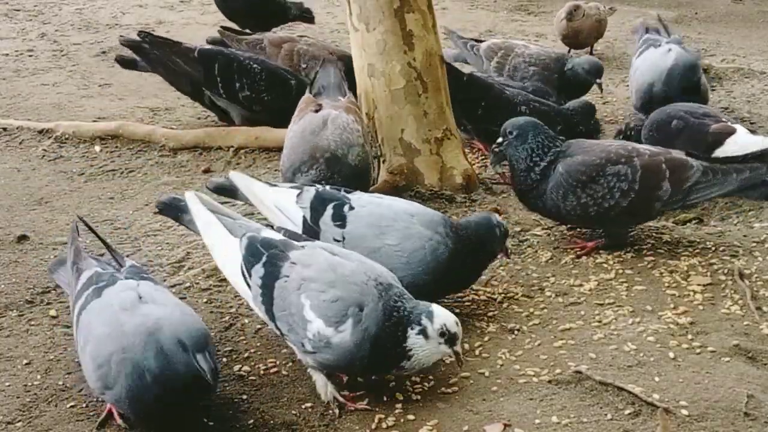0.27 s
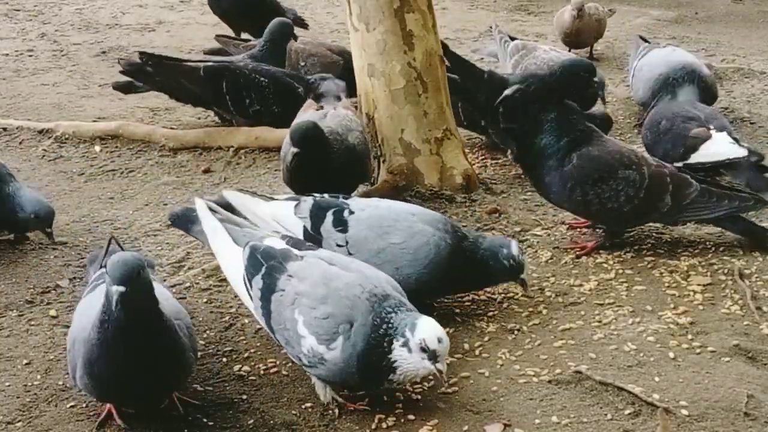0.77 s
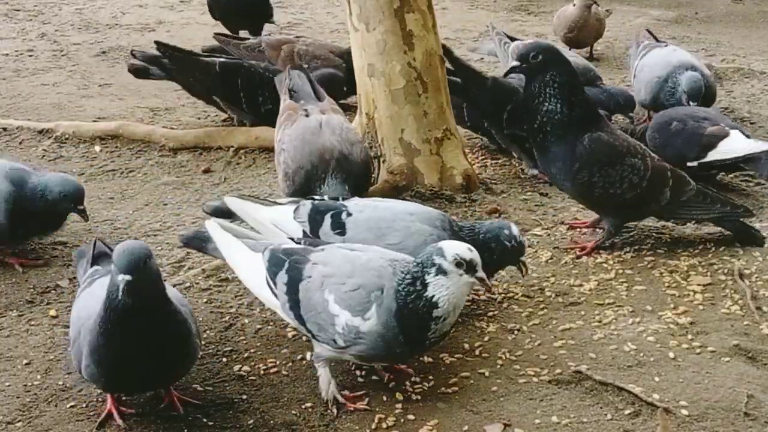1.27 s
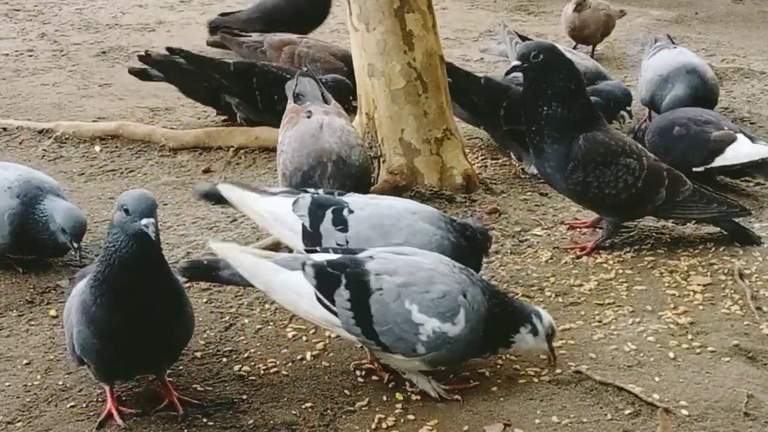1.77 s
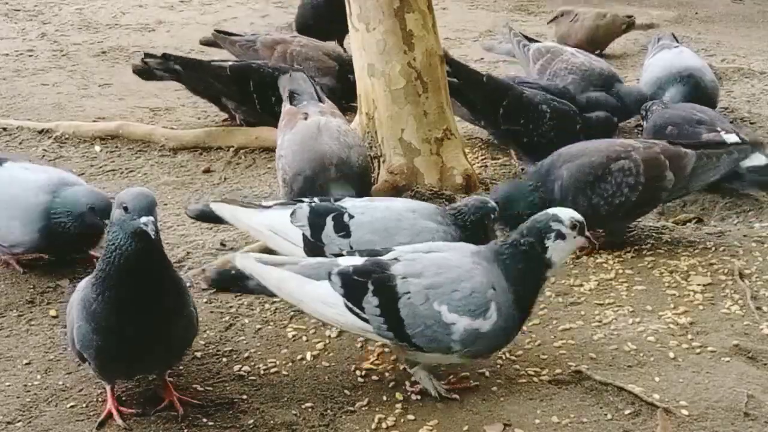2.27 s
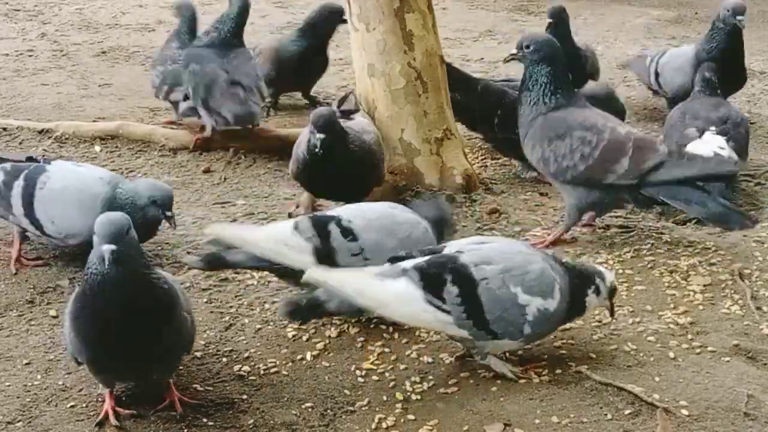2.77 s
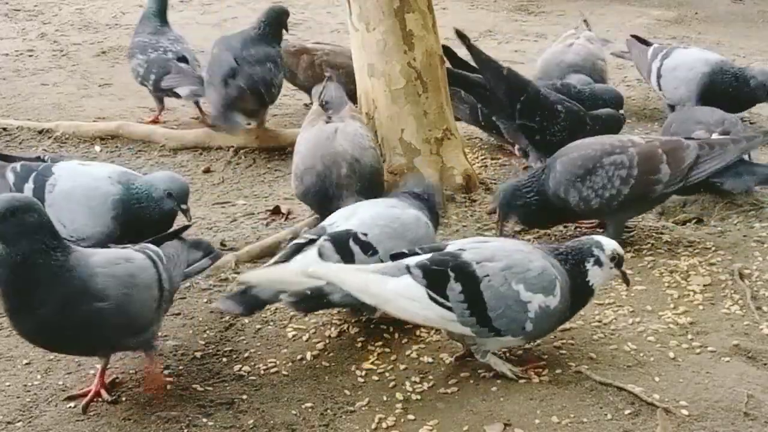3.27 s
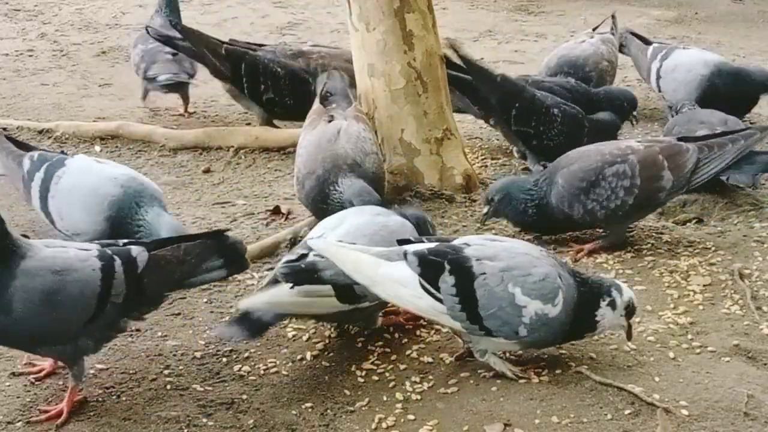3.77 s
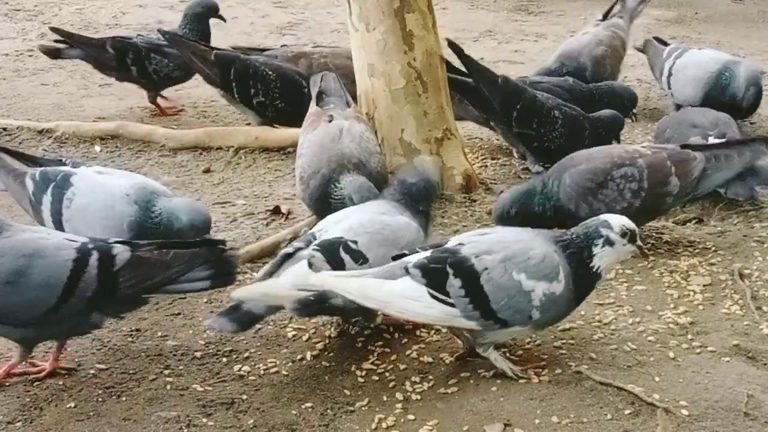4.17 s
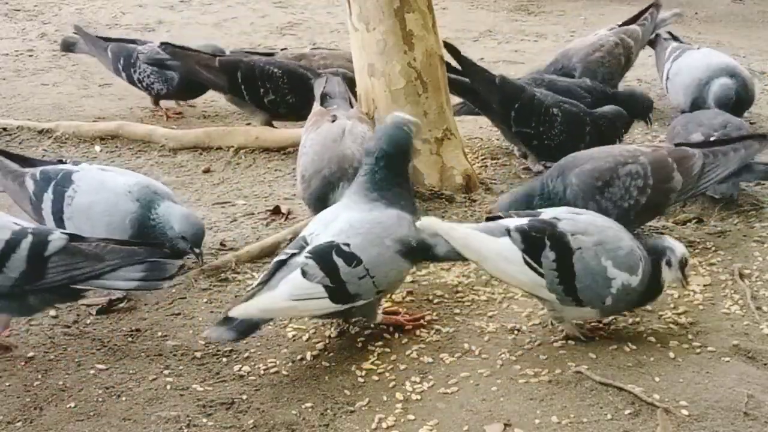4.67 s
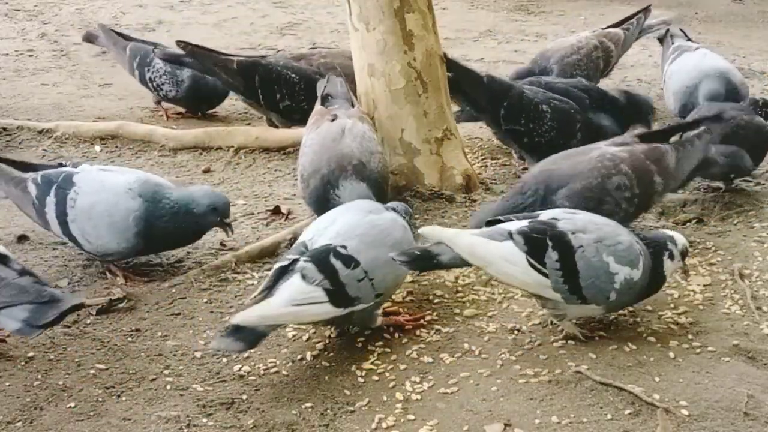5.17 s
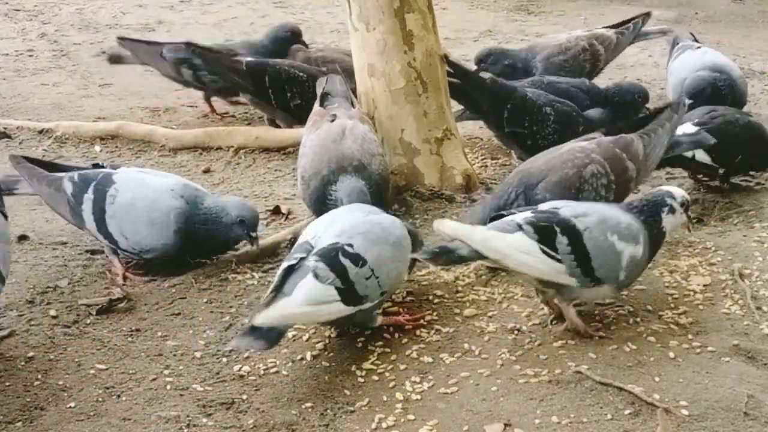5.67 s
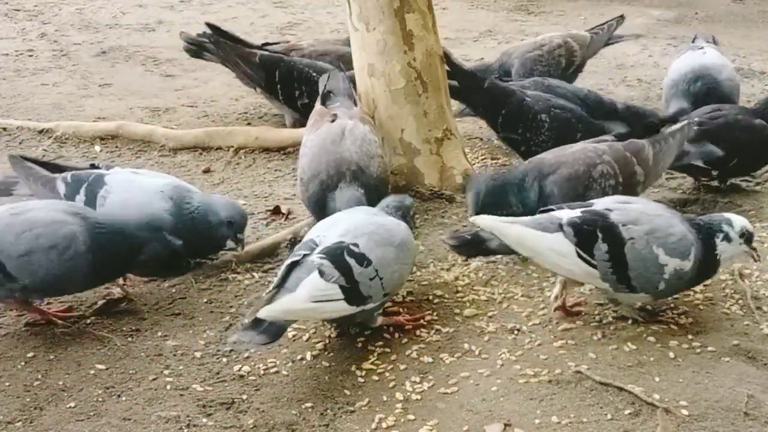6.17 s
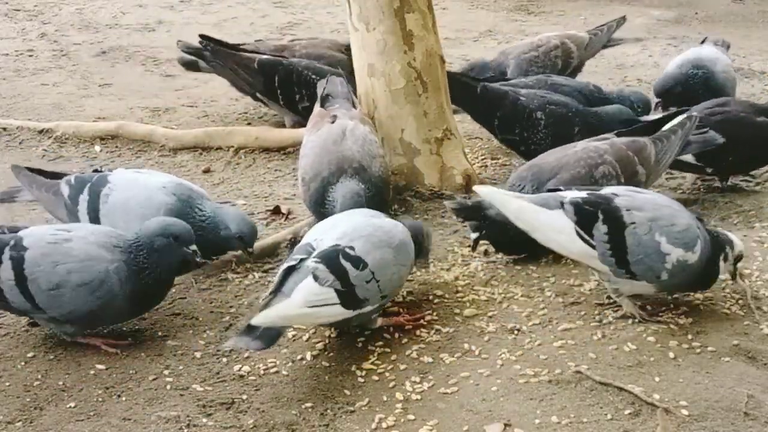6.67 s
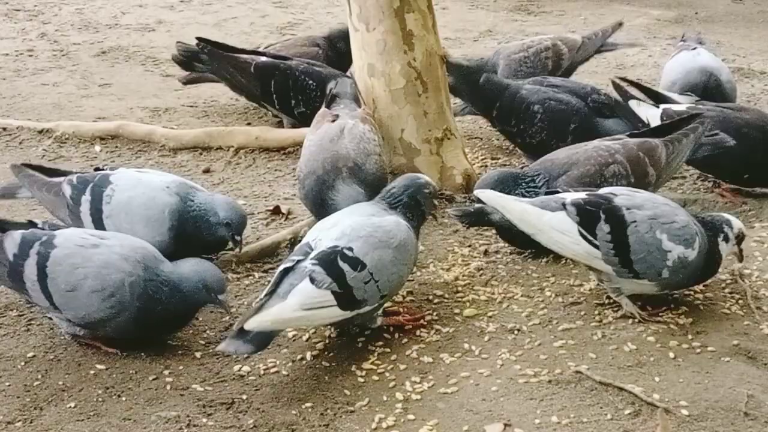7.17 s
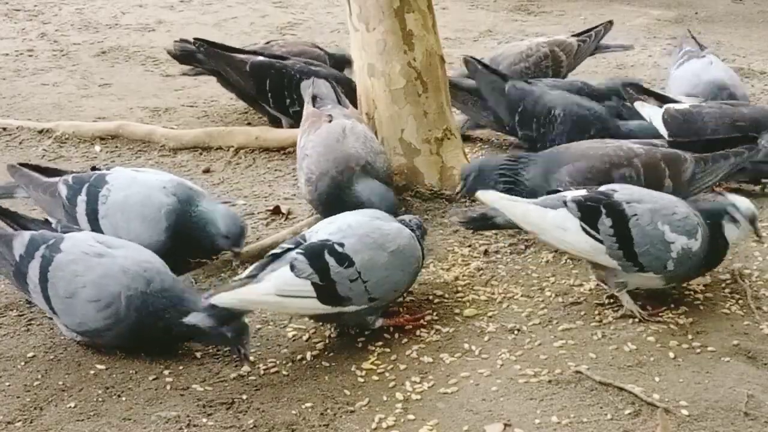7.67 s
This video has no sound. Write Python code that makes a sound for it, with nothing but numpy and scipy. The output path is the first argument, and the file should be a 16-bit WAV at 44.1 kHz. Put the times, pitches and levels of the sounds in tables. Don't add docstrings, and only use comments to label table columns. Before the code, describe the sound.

Close to a feeding flock of pigeons on bare ground, feathers rustle and soft wing puffs thump. Around two and a half seconds a loud wing clap starts a rapid flapping burst with throaty grunts, trailing off in thin wing whistles. Sparrows chirp brightly further off, echoing from walls. Near the end one pigeon gives a throbbing low coo. A faint town hum lies beneath, heard through a small microphone with little deep bass.

```python
import sys
import numpy as np
from scipy import signal
from scipy.io import wavfile
from scipy.ndimage import uniform_filter1d

SR = 44100
rng = np.random.default_rng(int(sys.argv[2]) if len(sys.argv) > 2 else 0)


def wav_record(signal):
    frames = np.transpose(np.atleast_2d(signal))
    bounded = np.clip(frames, -1, 1)
    quanta = np.round(bounded * 32767).astype(np.int16)
    wavfile.write(sys.argv[1], SR, quanta)


def boost(x):
    u = np.asarray(x, float) / 20
    return 10 ** u


N = 349713
AIR = [1, 1j] @ rng.standard_normal((2, 2 * N))


def evened(x):
    return x / np.sqrt(np.mean(x ** 2) + 1e-20)


def read(points, hz):
    f, value = np.transpose(points)
    return np.interp(np.log(hz + 1), np.log(f + 1), value)


def add(mix, s, sound):
    part = mix[max(round(s * SR), 0):][:len(sound)]
    part += sound[:len(part)]


def span(length):
    return np.arange(0, max(length, .004), 1 / SR)


def band(x, low_hz, high_hz, order):
    return signal.sosfilt(signal.butter(order, [low_hz, high_hz], "band", fs=SR, output="sos"), x)


def ring(hz, width_hz, shape):
    settle = 3000
    r = np.exp(-np.pi * width_hz / SR)
    raw = AIR[rng.integers(N):][:len(shape) + settle]
    wobble = signal.lfilter([1], [1, -2 * r, r * r], raw)[settle:]
    phase = 2 * np.pi * np.cumsum(hz * np.ones(len(shape))) / SR
    tone = (wobble * np.exp(1j * phase)).real
    return evened(shape * tone) * np.sqrt(np.mean(shape ** 2))


def noise(colour, patchy_db, flicker_db):
    frames, hz = N // 256 + 2, np.fft.rfftfreq(1024, 1 / SR)
    a, b, patches = rng.standard_normal((frames, len(hz), 3)).T
    patches = uniform_filter1d(patches, size=12, axis=0)
    patches = evened(uniform_filter1d(patches, size=12, axis=1))
    flicker = evened(uniform_filter1d(rng.standard_normal(frames), size=3))
    db = read(colour, hz)[:, None] + patchy_db * patches + flicker_db * flicker
    z = (a + 1j * b) * boost(db)
    return evened(signal.istft(z, nperseg=1024, noverlap=768)[1][:N])


# (frequency [Hz], level per Hz [dB])
TOWN = [(15, -53), (25, -57), (75, 4.5), (113, 9.5), (331, -10), (399, -59), (703, -40), (1300, -12.5),
        (2170, -15.5), (4500, -11), (5430, -13.5), (6730, -8.5), (9050, -28), (11800, -30), (15500, -21)]


def town():
    return boost(-60) * noise(TOWN, 1.3, 1.0)


# (time [s], length [s], start pitch [Hz], end pitch [Hz], level [dB])
SQUEALS = [(4.16, .15, 690, 680, -62), (5.06, 0.82, 1050, 990, -67.5), (4.59, .07, 1010, 1000, -64),
           (6.68, .22, 2330, 2290, -68), (5.86, .6, 3330, 3136, -67.5), (5.86, .5, 6570, 6440, -67.5),
           (6.17, .25, 3920, 3880, -72), (6.99, .08, 3860, 3840, -67), (6.852, .44, 681, 673, -64),
           (6.85, 1.3, 2290, 2170, -67.5), (.86, .11, 3520, 3480, -71), (1.48, .1, 4650, 4500, -70)]
# (time [s], length [s], start pitch [Hz], end pitch [Hz], level [dB])
SWEEPS = [(0.065, 0.27, 3750, 5170, -65), (1.915, 0.35, 4320, 4770, -62.5), (3.746, 0.088, 4600, 4730, -61),
          (6.504, 1.4, 3100, 2750, -66), (6.74, 0.14, 4300, 4900, -68), (7.9, 0.12, 674, 735, -47.5),
          (7.17, .07, 340, 330, -56), (7.04, .09, 225, 215, -57), (6.68, .12, 330, 250, -59),
          (5.17, 0.097, 9150, 8950, -69), (5.3, .2, 6600, 6800, -63), (6.65, .2, 1780, 1740, -66),
          (6.47, 0.039, 2200, 2380, -62), (6.2, .15, 4200, 4400, -70)]
# (time [s], length [s], start pitch [Hz], end pitch [Hz], level [dB])
WHOOSHES = [
    (5.17, 0.5, 1760, 1750, -62),
    (6.25, 0.49, 1800, 1810, -61),
    (7.091, 0.37, 4370, 4550, -65),
    (.33, 0.317, 909, 892, -55.5),
    (2.201, 0.12, 1860, 1555, -63),
    (2.454, 0.027, 2720, 2470, -48.5),
]


def far():
    out = np.zeros(N)
    for rows, width_hz in ((SQUEALS, 62), (SWEEPS, 180), (WHOOSHES, 320)):
        for s, length, from_hz, to_hz, db in rows:
            u = span(length) / length
            hz = from_hz + (to_hz - from_hz) * u
            shape = signal.windows.tukey(len(u), .7)
            sound = ring(hz, width_hz, shape)
            if rows is SQUEALS:
                sound = sound + boost(-6) * shape * np.sin(2 * np.pi * np.cumsum(hz) / SR)
            add(out, s, boost(db) * sound)
    return out


# (time into call [s], length [s], start pitch [Hz], end pitch [Hz], level [dB])
CHEEP = ([(0, .036, 2546, 3010, -4), (.003, 0.0374, 3124, 3290, 10.5)], [(.026, 0.024, 3300, 4500, -2.5),
         (.044, 0.048, 4640, 4330, -2.5)])
RISER = ([(.008, .045, 2520, 3560, 0)], [(.03, 0.035, 3186, 4370, -12), (.058, .045, 4650, 3950, -4)])
CHIRRUP = ([(0, .03, 2526, 3073, 0.011), (.03, 0.0303, 3087, 2940, 2.2), (.048, .032, 2680, 2410, -2),
           (.056, 0.097, 7300, 6780, -2)], [(.088, 0.022, 3100, 4000, -7), (.106, 0.022, 4120, 3900, -1),
           (.121, .04, 3750, 3200, -2)])
# (time [s], lead level [dB], main level [dB], pitch reach [ratio], pace stretch [ratio])
CHEEPS = [
    (1.711, -68.5, -40, 0.94, 1.08),
    (4.176, -58.5, -35.5, 1.03, 0.87),
]
RISERS = [
    (5.127, -62.5, -31.5, 1.12, 0.95),
]
CHIRRUPS = [
    (3.309, -67, -50.5, 0.81, 1.04),
    (4.423, -61, -42, 0.84, 0.89),
    (6.418, -59.5, -45, 0.85, 0.98),
    (7.692, -58, -43, 0.8, 0.97),
]
# (starting pitch [Hz], octave over tone [dB])
OCTAVE = [(2550, 17), (3040, 19.5), (3120, -0.5), (3150, -18), (4600, -20)]
# (time [s], length [s], start pitch [Hz], end pitch [Hz], level
# [dB])
PEEPS = [(0.838, 0.014, 6500, 5800, -52), (0.864, 0.014, 4440, 5500, -52), (0.954, 0.0235, 6800, 6950, -47),
         (0.96, 0.016, 6570, 3730, -48), (0.964, 0.057, 2750, 3520, -54), (0.98, 0.022, 3800, 4700, -43),
         (1.0, 0.05, 4700, 3600, -42.5), (1.498, 0.054, 6060, 5320, -63), (2.217, 0.053, 3730, 3720, -56),
         (2.204, 0.057, 5450, 4200, -52), (3.848, 0.02, 5100, 5600, -50), (3.897, 0.028, 5850, 6300, -37.5),
         (3.862, 0.03, 6250, 5900, -44), (1.717, 0.03, 2587, 3410, -47.5),
         (3.919, 0.021, 3254, 4320, -41.5), (3.925, 0.03, 4104, 3795, -41), (4.252, 0.031, 4010, 3870, -43),
         (5.29, 0.07, 4900, 4250, -47), (5.36, 0.025, 3450, 3350, -53), (5.762, 0.012, 4700, 4300, -54),
         (5.672, .012, 4900, 5500, -47), (5.684, .04, 5500, 6400, -52), (5.72, .05, 6600, 5500, -52),
         (5.68, .04, 2750, 3200, -54), (5.7, .04, 3250, 3950, -47), (5.74, .035, 4150, 3400, -40.5),
         (5.77, .03, 3500, 3200, -52), (3.86, .05, 3000, 3250, -59), (3.93, .016, 4720, 4350, -50),
         (1.04, .04, 6900, 6200, -56), (1.48, .03, 6000, 5950, -64), (7.75, .02, 7350, 7250, -52),
         (7.815, .02, 7100, 6600, -53),
         (.963, 0.019, 3630, 3700, -50.5), (1.0, 0.064, 4000, 3000, -51.5),
           (1.26, 0.025, 3150, 2900, -65), (1.708, 0.026, 2890, 3260, -56), (1.735, .03, 3410, 4100, -47),
           (1.765, 0.047, 3870, 3560, -50.5), (1.778, .015, 4980, 5560, -49),
           (2.197, 0.04, 7000, 6700, -59), (2.198, .03, 6200, 5500, -57), (2.22, .06, 3300, 2600, -58),
           (5.183, .045, 4870, 4800, -42), (5.205, .03, 4500, 4350, -36), (6.418, .015, 4500, 4900, -53),
           (4.478, .018, 7400, 7350, -54), (4.53, .04, 7400, 6600, -56), (.845, .014, 5200, 3700, -50),
           (.875, .03, 5700, 5300, -59), (4.25, .025, 4550, 4500, -41), (3.44, .015, 7000, 6500, -58),
           (3.914, .014, 6200, 7200, -48), (5.14, 0.033, 5000, 7360, -49), (6.445, 0.029, 6150, 6000, -44),
           (6.482, 0.026, 4800, 4700, -48), (6.528, .02, 3920, 3850, -45), (7.796, .022, 3920, 3820, -43),
           (7.364, 0.035, 6200, 6320, -48), (7.368, 0.025, 5040, 5770, -43),
           (7.372, 0.031, 2710, 3000, -54), (7.375, 0.02, 3350, 3500, -51),
           (7.392, 0.023, 3480, 4750, -34.5), (7.414, 0.023, 4750, 4450, -30.5),
           (7.437, 0.034, 4430, 4263, -31.5), (7.705, 0.048, 6180, 5900, -41), (7.7, .04, 2850, 3050, -61),
           (7.748, 0.021, 4950, 4880, -50)]


def strokes():
    reach_from_hz = 3100
    for shape, calls in ((CHEEP, CHEEPS), (RISER, RISERS), (CHIRRUP, CHIRRUPS)):
        for s, lead_db, main_db, reach, stretch in calls:
            for part, part_db in zip(shape, (lead_db, main_db)):
                for after, length, *hz, db in part:
                    octave_db = part_db + db + read(OCTAVE, hz[0])
                    if part is shape[1]:
                        hz = [reach_from_hz + (f - reach_from_hz) * reach for f in hz]
                    yield s + after * stretch, length * stretch, *hz, part_db + db, octave_db
    for *stroke, db in PEEPS:
        yield *stroke, db, db - 17.5


def sparrows():
    bend, swell_db = -.03, 14.5
    out, top = np.zeros(N), np.zeros(N)
    for s, length, from_hz, to_hz, db, octave_db in strokes():
        u = span(length) / length
        hz = from_hz + (to_hz - from_hz) * (u + bend * np.sin(2 * np.pi * u))
        shape = signal.windows.tukey(len(u), .45)
        rasp = boost(-5.5) * ring(hz * 0.95, 800.0, shape) + boost(-20.) * ring(hz * 1.3, 1700.0, shape)
        swell = boost(db + swell_db * np.log2(hz / hz.max()))
        octave = ring(2 * hz, 193.0, shape) + boost(-8.0) * ring(2 * hz, 1350.0, shape)
        add(out, s, swell * (ring(hz, 150.0, shape) + rasp))
        add(out, s, boost(octave_db) * octave)
        add(top, s, boost(max(db, octave_db) - 38.0) * ring(3 * hz, 500., shape))
        add(top, s, boost(octave_db - 31.5) * ring(4 * hz, 400., shape))
    return top + band(out, 2500., 7300., 6)


# (frequency [Hz], time to fall 60 dB [s])
YARD = [(300, 0.54), (2500, 0.63), (4500, 0.55), (7000, 0.48), (12000, 0.28)]
# (delay [s], level [dB])
WALLS = [
    (0, 2.5),
    (.04, -0.5),
    (.08, -4),
    (.12, 2.5),
    (.16, 1),
    (.2, 1.5),
    (.25, -0.5),
    (.3, 3),
    (.5, -34),
]


def yard(x):
    paths, turn_s = 7, .06
    taps = np.zeros((paths, SR))
    at = np.arange(200, SR - 20, 20)
    size = (paths, len(at))
    np.put_along_axis(taps, at + rng.integers(0, 20, size), rng.choice([-1., 1.], size), axis=1)
    hz, t, z = signal.stft(taps, SR, nperseg=256)
    decay_db = -60 * t / read(YARD, hz)[:, None]
    wall_db = np.interp(t, *np.transpose(WALLS))
    tails = signal.istft(z * boost(decay_db + wall_db), SR, nperseg=256)[1]
    away = (np.arange(N) / SR / turn_s - np.arange(paths)[:, None]) % paths - 1
    share = np.cos(np.pi / 2 * np.clip(away, -1, 1))
    echoes = signal.fftconvolve(x * share, tails / np.linalg.norm(tails[0]), axes=1)
    return echoes[:, :N].sum(axis=0)


# (frequency [Hz], level per Hz [dB])
HISS = [(1530, -14), (2600, -6), (3500, -5.5), (4150, -2.5), (5380, -3.5), (6770, 2), (9520, -19.5),
        (11900, -18), (15300, -13)]
# (frequency [Hz], level per Hz [dB])
SWISH = [(140, -2), (230, -2), (338, -0.5), (440, -3.5), (943, -6.5), (1250, -12), (2600, -18), (3380, -78),
         (5720, -120)]
# (peak time [s], rise [s], fall [s], swish level [dB], hiss
# over swish [dB])
SWELLS = [(.46, 0.16, 0.28, -55, -8), (1.04, 0.24, 0.26, -66.5, -3.5), (1.77, 0.083, 0.29, -63, -6.5),
          (2.25, 0.23, 0.18, -70.5, 1.5), (2.46, 0.017, 0.43, -54, -8.5), (2.87, 0.07, 0.13, -59, -1.5),
          (2.98, 0.054, 0.071, -61, 1), (3.13, 0.033, 0.032, -52.5, -9.5), (3.3, 0.2, 0.48, -64.5, -8),
          (3.89, 0.075, 0.38, -64.5, 1), (4.37, 0.1, 0.22, -70, 6.5), (4.39, 0.032, 0.11, -59, -6),
          (4.7, 0.11, 0.3, -73.5, 3), (4.931, 0.29, 0.056, -71.5, 5), (5.13, 0.011, 0.25, -63.5, -5),
          (2.56, 0.045, 0.091, -65.5, 1.5), (2.68, 0.036, 0.059, -66.5, -2), (2.78, 0.026, 0.062, -66.5, 2),
          (.3, 0.037, .06, -62.5, -11), (.64, 0.046, .16, -66, -4), (.77, .04, .05, -68, -2),
          (7.19, 0.055, 0.073, -64, -17), (5.47, 0.26, 0.065, -72, 5), (6.49, 0.089, 0.61, -67.5, -1),
          (6.881, 0.027, 0.55, -57.5, -24), (7.42, 0.12, 0.22, -71.5, 5.5), (7.75, 0.21, 0.12, -71, 4)]


def feathers():
    t = np.arange(N) / SR
    swish_power, hiss_power = boost(-69.5) ** 2, boost(-101) ** 2
    for s, rise_s, fall_s, db, hiss_db in SWELLS:
        away = np.where(t < s, (s - t) / rise_s, (t - s) / fall_s)
        burst = boost(db - 10 * away) ** 2
        swish_power = swish_power + burst
        hiss_power = hiss_power + burst * boost(hiss_db) ** 2
    grains = rng.exponential(1, N) * (rng.random(N) < .006)
    grain = evened(1 + 0.18 * evened(uniform_filter1d(grains, size=60)))
    hiss = np.sqrt(hiss_power) * boost(12.5) * noise(HISS, 0.96, 1.73) * grain
    return hiss + np.sqrt(swish_power) * boost(4.0) * noise(SWISH, 2.8, 1.1)


# (time [s], peak level [dB], pitch [Hz])
PUSHES = [(0.265, -35.5, 118.6), (0.363, -32.5, 148), (0.45, -32, 124), (0.513, -34, 99), (0.629, -38, 130),
          (0.725, -41, 96), (0.826, -47, 134), (0.924, -45, 93.5), (1.181, -39.5, 76), (1.538, -50, 87),
          (1.75, -42, 96), (1.809, -43, 73), (1.899, -33.5, 102), (2.269, -48, 125), (2.448, -42.5, 95),
          (2.742, -38.5, 95), (2.812, -45.5, 106), (2.87, -43, 99), (4.067, -40, 144), (5.25, -46, 120),
          (6.471, -54, 135)]


def pushes():
    out = np.zeros(N)
    u = span(0.033) / 0.04
    shape = np.clip(u / 0.28, 0, 1) * (1 - u)
    for s, db, hz in PUSHES:
        add(out, s - .004, boost(db - 5.5) * ring(hz, 97.0, shape))
    return out


# (time [s], peak level [dB])
TICKS = [(.19, -54), (.2865, -46), (.3765, -46), (.4605, -47), (4.435, -52), (2.4445, -33), (4.393, -50),
         (4.65, -53), (5.1187, -35), (6.14, -55), (6.272, -56)]


def ticks():
    out, t = np.zeros(N), span(.006)
    for s, db in TICKS:
        add(out, s, boost(db) * .5 * ring(8800., 4500., np.exp(-t / 0.00074)))
    return out


# (time [s], peak level [dB])
WHISTLES = [(2.4424, -49), (2.567, -58), (2.66, -45), (2.7946, -47), (2.8877, -42.5), (3.0007, -40),
            (3.1236, -44), (3.228, -52), (3.375, -48.5), (3.532, -47), (3.654, -45.5), (3.7503, -40.5),
            (3.8607, -45), (3.9723, -44.5), (4.079, -43), (4.2, -55), (4.3363, -46.5), (4.476, -51),
            (4.7964, -53.5), (4.9172, -51), (5.0253, -50.5), (5.129, -48.5)]


def whistles():
    out = np.zeros(N)
    u = span(.1) / .1
    hz = 2350 * (.98 + 0.024 * u)
    shape = np.clip(u / 0.12, 0, 1) * (1 - u) ** 0.7
    for s, db in WHISTLES:
        add(out, s - .004, boost(db - 12.0) * ring(hz, 160.0, shape))
    return out


# (time [s], peak level [dB], body over snap [dB], body pitch [Hz])
CLAPS = [(0.18, -52, 6, 924), (0.276, -48, 4, 2000), (0.368, -46, 4, 1400), (0.54, -37, -6, 965),
         (0.634, -43, -6, 1170), (1.6208, -43, -2, 2050), (2.4435, -22.5, -33, 2200),
         (2.4441, -28.5, -23, 930), (2.536, -32, -22, 1790), (2.646, -29, -9.5, 1910),
         (2.7521, -29, -2, 1450), (2.8645, -31, -2, 1556), (2.9265, -28, -45, 1630),
         (2.9796, -28.5, -5, 1290), (3.0968, -33.5, -9, 1350), (3.124, -30.5, -24, 930),
         (3.1309, -27.5, -22, 1980), (3.2266, -30, -13.5, 880), (3.3607, -40, -4, 1890),
         (3.489, -36.5, -9, 940), (3.62, -51, 3, 1700), (3.735, -50, 0, 1800), (3.843, -43.5, -3, 800),
         (4.3938, -38, -4, 930), (5.2534, -42, -1, 1860), (6.4732, -35, -24, 1746)]


def claps():
    out, t = np.zeros(N), span(.12)
    snap = noise([(f, db + np.log2(f)) for f, db in HISS], 0.069, .1)
    rise = np.clip(t / .0002, 0, 1)
    rattle, rush = 0.16 * np.exp(-t / 0.009), .065 * np.exp(-t / .045)
    burst = rise * (np.exp(-t / 0.0017) + rattle + rush)
    for s, db, body_db, hz in CLAPS:
        air = snap[round(s * SR):][:len(t)] * burst
        body = ring(hz, 1200.0, rise * np.exp(-t / 0.0042))
        add(out, s, boost(db - 2.0) * (air / abs(air).max() + boost(body_db) * body / abs(body).max()))
    return out


# (time [s], peak level [dB], low pitch [Hz], upper part [dB])
GRUNTS = [(1.588, -53, 298, 4.5), (1.619, -43, 340, -4), (1.734, -48.5, 485, -3.5), (2.49, -47, 358, 5),
          (2.534, -29, 345, -10), (2.548, -37, 380, -8), (2.28, -52, 500, 0), (2.61, -42, 370, -6),
          (2.569, -37, 356, -12), (2.667, -35, 343, -31), (3.122, -31.5, 400, -3), (3.135, -36, 520, -2),
          (.372, -46, 420, 0), (.455, -44, 520, 2), (.52, -45, 480, 2), (.585, -49, 500, 0),
          (3.237, -43.5, 352, -5), (4.389, -37, 340, -0.5), (4.437, -52, 265, -3), (4.506, -52, 475, 6),
          (5.236, -47, 224, -0.5), (5.943, -52.5, 356, -1), (6.001, -49, 300, -3.5), (6.085, -50, 516, 2.5),
          (6.19, -52, 300, 5), (3.96, -56, 620, 0), (4.197, -58, 700, 0), (4.41, -52, 400, 4),
          (6.173, -50, 360, 5.5)]


def grunts():
    out = np.zeros(N)
    u = span(0.018) / 0.034
    shape = np.clip(u / 0.2, 0, 1) * (1 - u)
    for s, db, hz, upper_db in GRUNTS:
        upper = ring(699.6, 255.0, shape) + boost(-6.5) * ring(1836.0, 330.0, shape)
        add(out, s - .003, boost(db - 7.0) * (ring(hz, 89.0, shape) + boost(upper_db) * upper))
    return out


def voice(rows):
    s, *columns = np.transpose(rows)
    t = np.arange(s[0], s[-1], 1 / SR)
    db, hz, *rest = (np.interp(t, s, c) for c in columns)
    shaky = 1 + 0.036 * evened(uniform_filter1d(AIR.real[:len(t)], size=300))
    level = boost(db) * signal.windows.tukey(len(t), .1)
    return t, level, 2 * np.pi * np.cumsum(hz * shaky) / SR, *rest


# (time [s], level [dB], pitch [Hz], octave [dB])
ROLL = [
    (7.3, -60, 200, -3),
    (7.335, -50, 270.7, -1),
    (7.36, -50.5, 294.5, 3),
    (7.4, -46, 333, 4),
    (7.445, -45.5, 341.5, 1),
    (7.49, -49.5, 317, 5),
    (7.525, -46.5, 290, 5),
    (7.56, -56, 286, 0),
    (7.625, -66, 258, 1),
]
# (time [s], peak level [dB], pitch [Hz], rise [s], fall [s])
THROBS = [
    (7.361, -35.5, 295, 0.014, 0.015),
    (7.414, -25.5, 356, 0.0076, .003),
    (7.46, -26.5, 392, 0.0022, 0.0096),
    (7.486, -39, 417, .005, 0.0071),
    (7.519, -32.5, 307, 0.0025, 0.013),
    (7.55, -43, 354, .006, .01),
    (7.595, -44, 240, 0.0052, .01),
    (7.6, -46.5, 472, .008, 0.012),
]
# (time [s], level [dB], pitch [Hz])
COO = [
    (7.635, -49, 191.6),
    (7.68, -54.5, 196.9),
    (7.74, -48, 197.8),
    (7.79, -51.5, 193.3),
    (7.84, -48, 191),
    (7.875, -49.5, 198),
    (7.895, -46.5, 253),
    (7.92, -70, 225.5),
]
COO_PARTS_DB = [-0.5, -4, -4.5, -27]


def coo():
    out = np.zeros(N)
    t, level, phase, octave_db = voice(ROLL)
    flutter = 1 + 0.54 * np.cos(2 * np.pi * 24.9 * (t - 7.44))
    add(out, t[0], 1.17 * level * (np.sin(phase) + flutter * boost(octave_db) * np.sin(2 * phase)))
    breath = evened(band(AIR.imag[:len(t)], 280., 720., 2))
    add(out, t[0], boost(-13.5) * level * breath)
    for s, db, hz, rise_s, fall_s in THROBS:
        lump = np.exp(-((t - s) / np.where(t < s, rise_s, fall_s)) ** 2)
        beat = np.sin(2 * np.pi * hz * (t - s)) + boost(-19.5) * breath
        add(out, t[0], boost(db) * lump * beat)
    t, level, phase = voice(COO)
    hum = sum(boost(db) * np.sin((k + 1) * phase) for k, db in enumerate(COO_PARTS_DB))
    add(out, t[0], level * evened(hum))
    return out


def scene():
    wings, throats, song = claps() + whistles(), grunts(), coo()
    birds = boost(-1.0) * sparrows()
    echo = yard(boost(-6.5) * wings + boost(-4.5) * throats + boost(-9.5) * song + birds)
    flock = wings + throats + song + pushes() + feathers() + ticks()
    return (town() + far() + birds + echo + flock)[None]


def low_pass(x):
    return signal.sosfilt(signal.butter(12, 16670, fs=SR, output="sos"), x)


def record(dry):
    thin = signal.sosfilt(signal.butter(3, 55., "high", fs=SR, output="sos"), dry)
    top_cut = signal.firwin(511, 15590, window=("kaiser", 6), fs=SR)
    thin = signal.oaconvolve(thin, top_cut[None], "same")
    return low_pass(thin)


dry = scene()
out = record(dry)
wav_record(out)
```